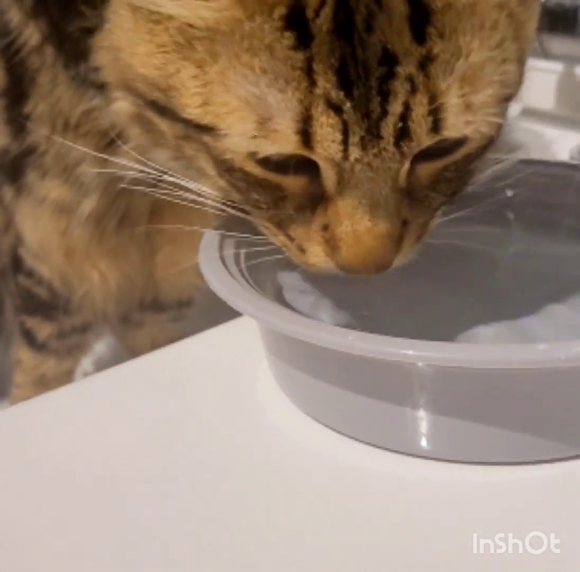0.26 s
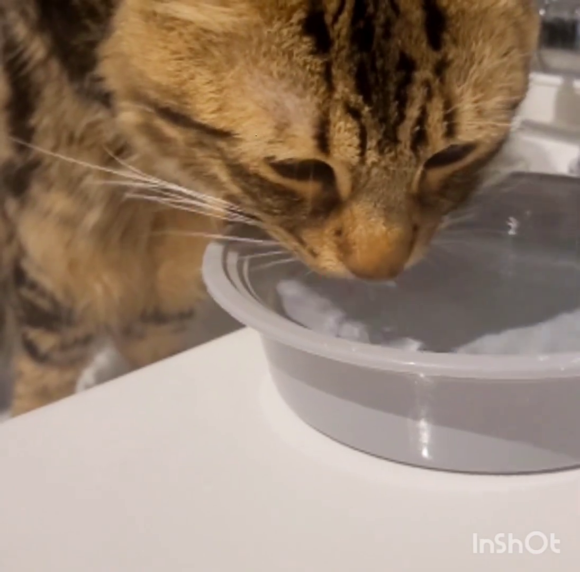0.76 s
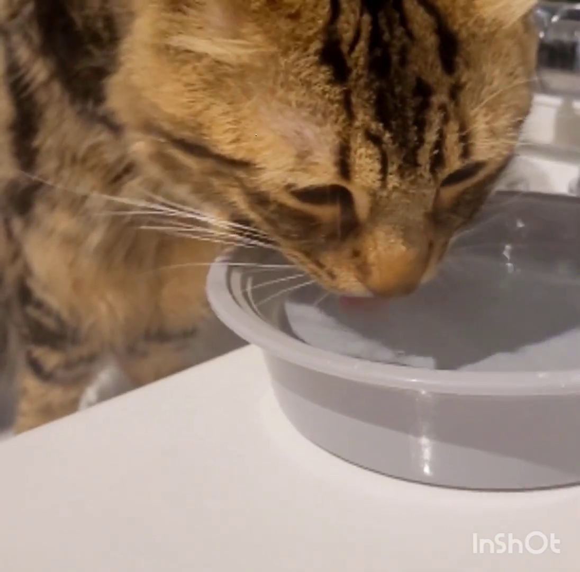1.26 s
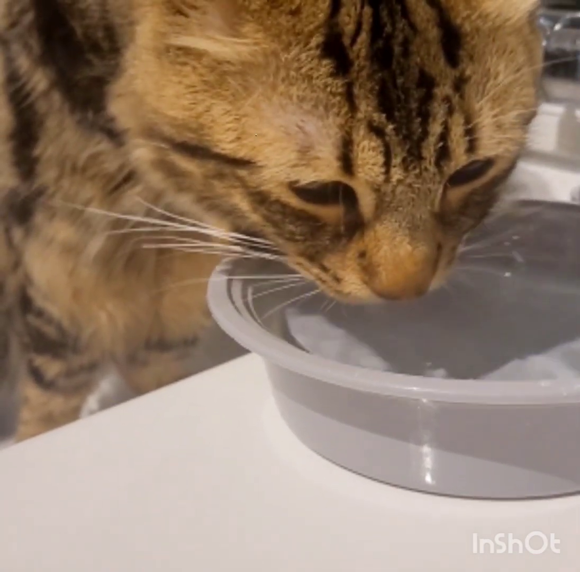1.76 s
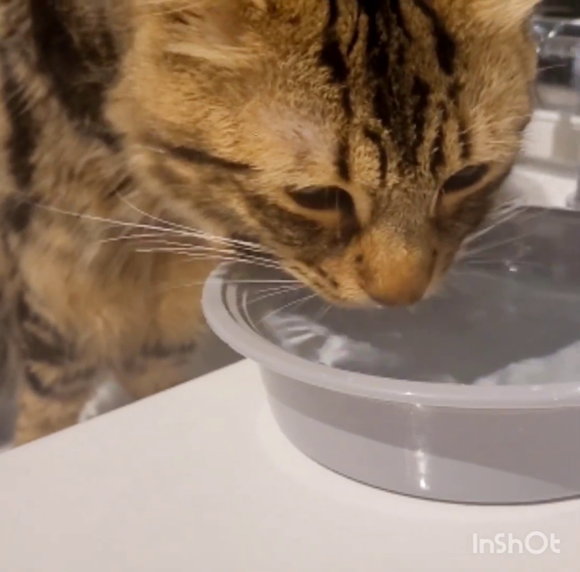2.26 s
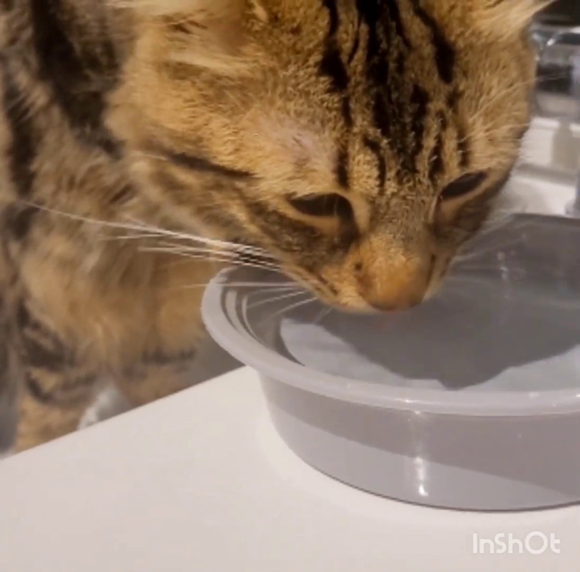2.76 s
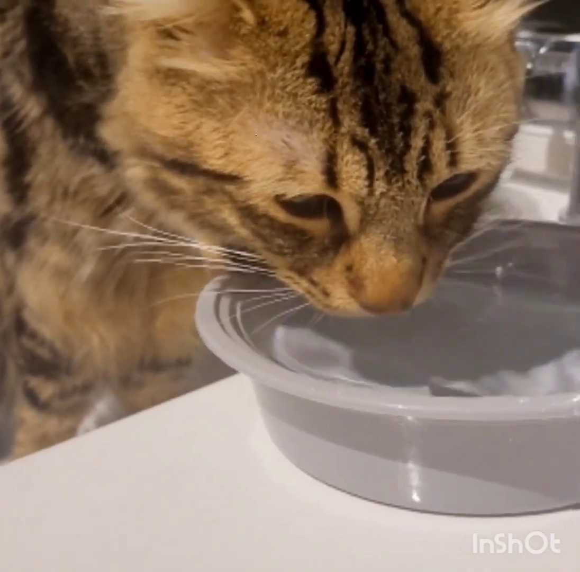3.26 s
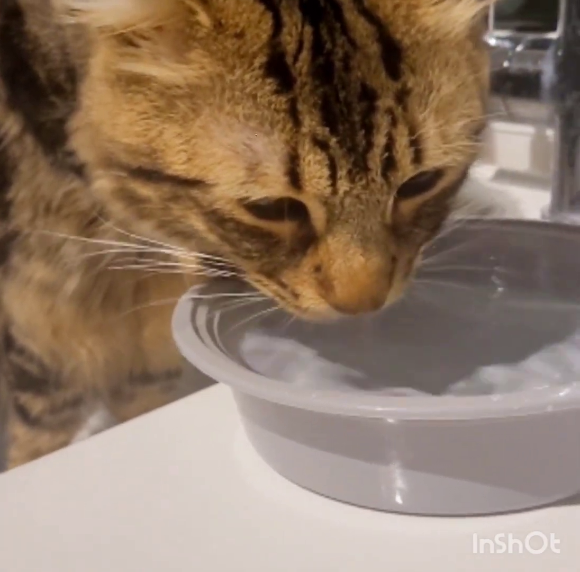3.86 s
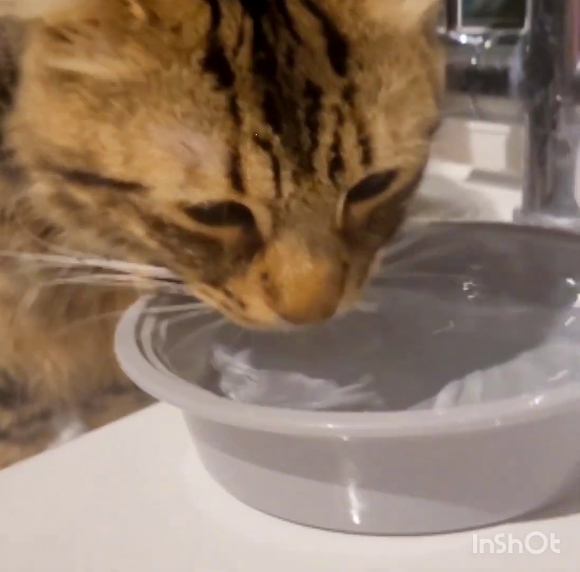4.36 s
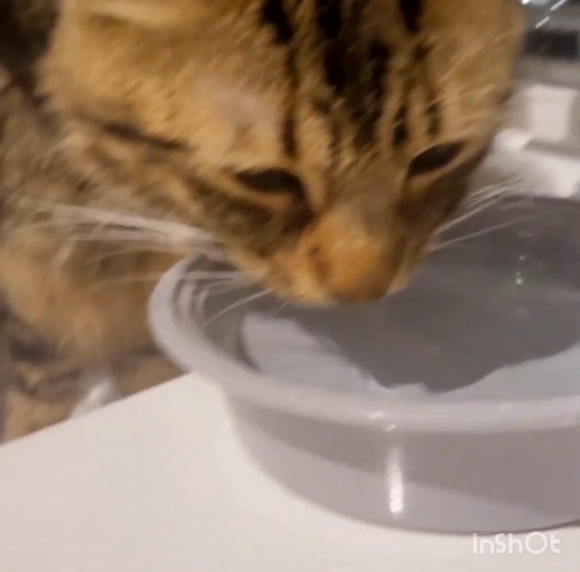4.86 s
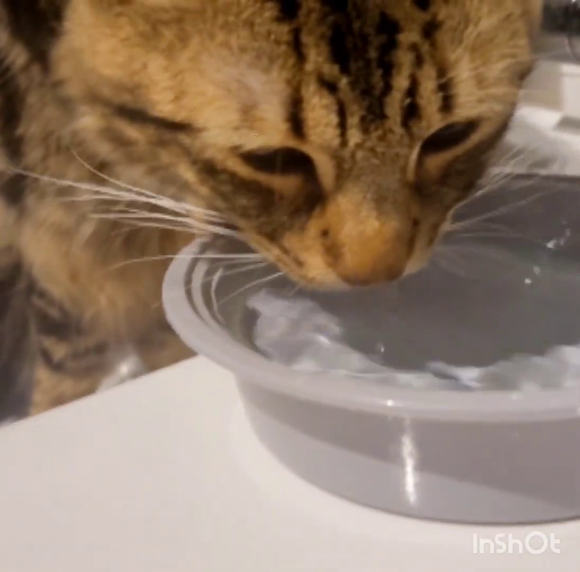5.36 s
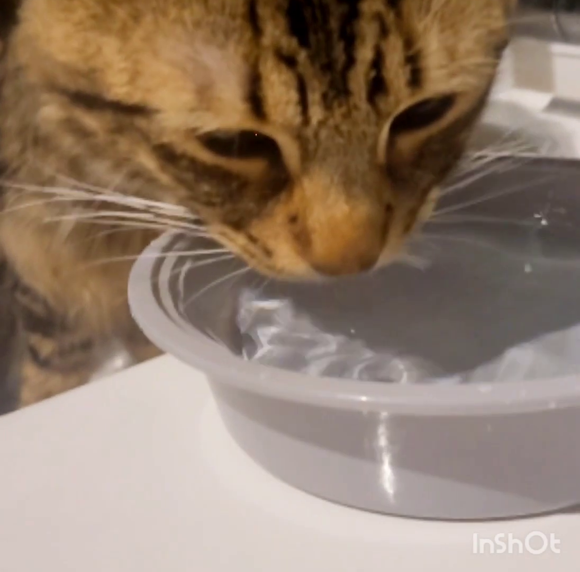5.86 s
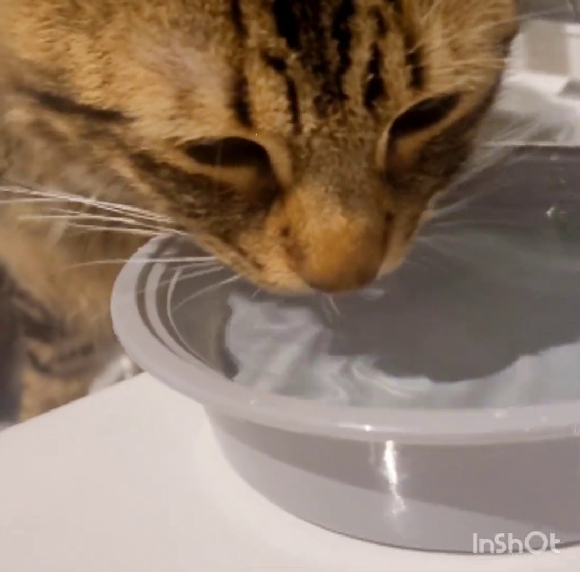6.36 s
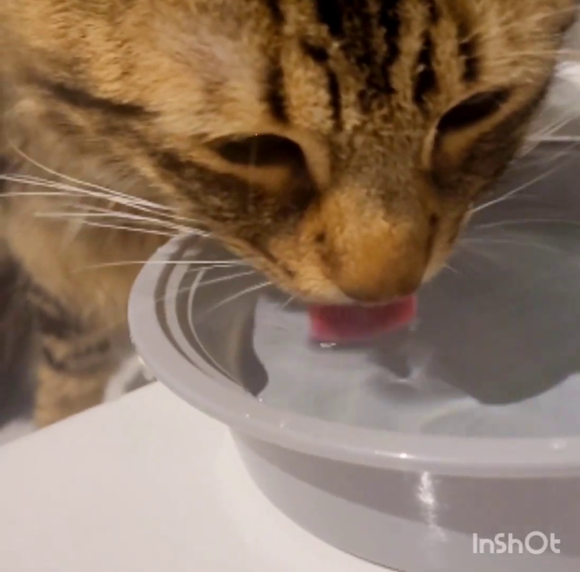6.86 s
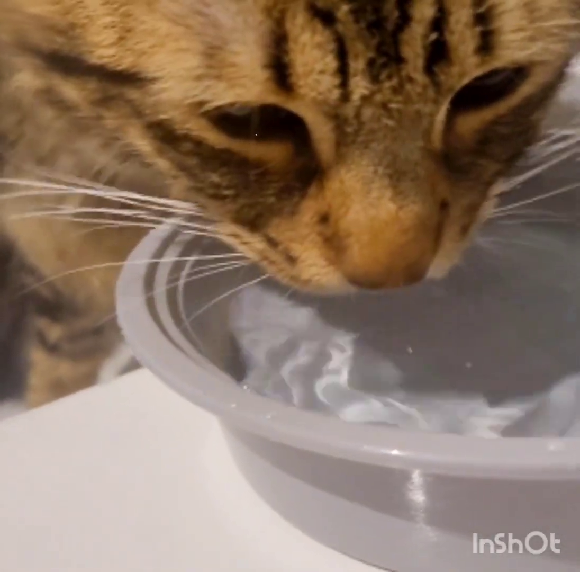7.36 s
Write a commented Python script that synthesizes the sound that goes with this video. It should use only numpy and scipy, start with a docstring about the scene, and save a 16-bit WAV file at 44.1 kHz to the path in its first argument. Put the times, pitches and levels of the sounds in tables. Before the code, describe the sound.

Close, quiet tongue lapping and tiny droplets in a small hard room, later overpowered by dull handling thuds, crackling bumps and grainy skin rubbing.

```python
"""Cat lapping water, hand-held phone

A cat laps from a plastic bowl in a small hard room, close to a phone with two microphones. Tongue pops
and smacks are short ringing blips with noise tails; the nose puffs noise about once a second, with a gap.
Mostly from four seconds on, a finger rubs and slips on the case by the right microphone: hiss from grainy
noise, ticks from blips and low thumps from swings of the case. Knocks, rumble and hum lie behind."""
import sys
import numpy as np
from scipy import signal
from scipy.io import wavfile
from scipy.ndimage import uniform_filter1d

SR = 44100
rng = np.random.default_rng(int(sys.argv[2]) if len(sys.argv) > 2 else 0)


def write(x):
    x = np.atleast_2d(x).T
    wavfile.write(sys.argv[1], SR, np.round(np.clip(x, -1, 1) * 32767).astype(np.int16))


N = 336042
EDGE_HZ = 15900  # upper limit of the recorder's band, and of smack film and droplet pitches

# tongue and water pops at the surface: start_s, level_db, pitch_hz
POPS = [(0.252, -63.5, 1440), (0.572, -60, 1400), (0.736, -65.5, 1100), (0.814, -69, 895),
        (0.843, -60, 1520), (0.858, -64, 2080), (1.074, -69, 1320), (1.1, -60.5, 1510),
        (1.251, -69.5, 1510), (1.376, -56, 1540), (1.472, -58, 745), (1.62, -58.5, 1610),
        (1.685, -65, 1360), (1.857, -62, 780), (1.909, -51.5, 1585), (1.936, -52.5, 1530),
        (2.265, -62.5, 704), (2.495, -61, 1210), (2.567, -62, 1530), (2.831, -57.5, 1470),
        (2.855, -61.5, 2120), (2.948, -62.5, 1520), (3.116, -59.5, 1500), (3.213, -60, 1780),
        (3.241, -52.5, 900), (3.43, -56.5, 1480), (3.578, -61.5, 1400), (3.949, -61.5, 1970),
        (4.571, -51.5, 1040), (4.589, -55.5, 1210), (5.327, -51.5, 850), (5.514, -49, 1640),
        (5.764, -51.5, 990), (6.44, -56.5, 2120), (7.228, -51, 650), (7.313, -59, 1640),
        (7.357, -46.5, 850), (7.401, -56.5, 1960), (7.438, -48.5, 885), (7.608, -46.5, 1450)]
# wet smacks of tongue and lips: start_s, level_db, pitch_hz
SMACKS = [(0.185, -55.5, 7100), (0.608, -63.5, 8400), (1.6337, -58, 12600), (1.8572, -59, 7900),
          (1.8834, -56.5, 11600), (1.918, -53.5, 9700), (1.936, -54.5, 10300), (2.191, -52.5, 11000),
          (2.298, -59.5, 4640), (2.409, -53, 13100), (2.457, -55, 13900), (2.503, -59, 10900),
          (2.6374, -54, 14400), (3.597, -60.5, 8250), (3.999, -50, 4640), (4.1402, -52, 6600),
          (4.299, -60, 7350), (4.3616, -48.5, 4630), (4.715, -49, 11400), (4.8, -53, 12200),
          (4.918, -49, 11100), (4.9346, -51.5, 10200), (5.4293, -48.5, 6800), (5.6486, -50.5, 5470),
          (5.679, -39.5, 15900), (5.9507, -50, 6200), (6.62, -49.5, 4600), (6.806, -51, 6000),
          (6.8263, -51, 13400), (6.858, -51, 5150), (6.982, -45, 5100), (7.228, -51, 13300),
          (7.2437, -47.5, 5500), (7.3122, -55, 11600), (7.3272, -50, 5340), (7.479, -52.5, 6500),
          (7.4957, -59, 11600), (7.515, -53, 3980), (7.55, -57, 7640), (7.593, -48, 8700),
          (7.6112, -36, 5000)]
# room share of water sounds, deep pops stay close under the tongue, high ones spill out: pitch_hz, share_db
POP_ROOM = [(800, -17), (1400, -3.5)]


def amp(db):
    """dB to gain."""
    return 10 ** (np.asarray(db) / 20)


def evened(x):
    """Scales to rms 1."""
    return x / np.sqrt(np.mean(x ** 2) + 1e-20)


def read(points, hz):
    """Reads a table on a log-frequency axis."""
    f, value = np.transpose(points)
    return np.interp(np.log(hz + 1), np.log(f + 1), value)


def add(mix, s, sound):
    """Mixes a sound in at s seconds."""
    part = mix[round(s * SR):][:len(sound)]
    part += sound[:len(part)]


def resonate(x, modes):
    """Sum of two-pole resonances, each given as pitch, width and level."""
    total = 0
    for hz, width_hz, db in modes:
        b, a = signal.iirpeak(hz, hz / width_hz, SR)
        total = total + amp(db) * signal.lfilter(b, a, x)
    return total


def blip(db, hz, cycles, glide=0.75):
    """A brief ring, as of a small air pocket; cycles sets its length, positive glide raises its pitch."""
    turns = np.arange(3000) * hz / SR
    swell = turns ** 2 * np.exp(-turns / (0.13 * cycles))
    shape = swell * np.sin(2 * np.pi * turns * (1 + 0.02 * glide * turns))
    return amp(db) * shape / abs(shape).max()


def mottled(x, patchy_db):
    """Lets the colour of a noise drift in patches of time and frequency."""
    z = signal.stft(x, nperseg=512)[2]
    patches = rng.standard_normal(z.shape[::-1]).T
    patches = uniform_filter1d(uniform_filter1d(patches, 14, 0), 16, 1)
    return signal.istft(z * amp(patchy_db * evened(patches)), nperseg=512)[1][:N]


def tongue_pops(near, far):
    """Air pockets close under the tongue: a ring, a higher snap and an uneven churn of water."""
    # deep pops are blunt, high ones ring: pitch_hz, length_cycles
    pop_cycles = [(900, 1.94), (1450, 3.9)]
    slosh_db, slosh_t60_s = -15, 0.36
    t = np.arange(7000) / SR
    for s, db, hz in POPS:
        noise, wobble = rng.standard_normal((2, len(t)))
        room_db = read(POP_ROOM, hz)
        ragged = amp(4.8 * evened(uniform_filter1d(wobble, 350)) - 60 * t / slosh_t60_s)
        churn = evened(resonate(noise, [(hz, 190, 0)]))
        add(near, s, amp(db + slosh_db + room_db) * ragged * churn)
        ring = blip(db, hz, read(pop_cycles, hz), glide=0.43)
        snap = blip(db - 4.0, 1.6 * hz, 4.2)
        add(near, s, ring + snap)
        add(far, s, blip(db - 4.0 + room_db, hz, 13.0, glide=0.32))


def wet_smacks(near, far):
    """Tongue and lips part with a ring and a crack while a film of water fizzes around the same pitch."""
    ring_db, crack_db, room_db, fizz_db = -2.5, -2.5, -9, -22.5  # relative to each smack's level
    fizz_t60_s, fizz_width = 0.21, 0.34  # width as a share of the pitch
    t = np.arange(7000) / SR
    for s, db, hz in SMACKS:
        film = [(min(hz, EDGE_HZ), fizz_width * hz, 0)]
        fizz = evened(resonate(resonate(rng.standard_normal(len(t)), film), film))
        add(near, s, amp(db + fizz_db - 60 * t / fizz_t60_s) * fizz)
        add(near, s, blip(db + ring_db, hz, 18, glide=0.099) + blip(db + crack_db, hz, 0.67))
        two_pockets = blip(db, hz, 2.5) + 1.3 * blip(db, hz * 0.96, 2.7)
        add(far, s, amp(room_db) * two_pockets)


def droplets(near, far):
    """Each pop and smack sheds five smaller droplets, more fall at random; each is a short ring."""
    drops = []
    for s, db, hz in POPS + SMACKS:
        for when, size, pitch in rng.random((5, 3)):
            drops.append((s + 0.09 * when, db - 27.5 + 12 * size, hz * (0.725 + 0.45 * pitch)))
    for when, size, pitch in rng.random((160, 3)):
        drops.append((when * N / SR, -84 + 12 * size, 600 * 20 ** pitch))
    for s, db, hz in drops:
        drop = blip(db, min(hz, EDGE_HZ), 10.0)
        add(near, s, drop)
        add(far, s, amp(9.0 + read(POP_ROOM, hz)) * drop)


def bowl_knocks(near, far):
    """The bowl knocks dully on the counter: low rings of like duration at any pitch."""
    # knocks: start_s, level_db, pitch_hz
    knocks = [(.008, -57, 296), (.09, -63.5, 333), (1.332, -66.5, 171), (3.079, -60.5, 175)]
    for s, db, hz in knocks:
        add(near, s, blip(db, hz, 0.027 * hz, glide=0.071))
        add(far, s, blip(db + 3.0, hz, 3.2, glide=0.1))


def lapping():
    """Everything at the bowl; returns direct sound and what feeds the room."""
    near, far = np.zeros((2, N))
    tongue_pops(near, far)
    wet_smacks(near, far)
    droplets(near, far)
    bowl_knocks(near, far)
    return near, far


def nose():
    """Turbulent air through the nostrils: coloured noise with a quick start and a fading end."""
    # puffs of air: start_s, level_db
    puffs = [(0.53, -77), (1.53, -80), (3.528, -83), (4.527, -75), (5.517, -74.5), (6.521, -69.5),
             (7.53, -76.5)]
    # nostril resonances: pitch_hz, width_hz, level_db
    nostrils = [(1460, 1000, 9), (3980, 440, 5), (5800, 7100, -4.5)]
    out, t = np.zeros(N), np.arange(8000) / SR
    for s, db in puffs:
        air = evened(resonate(rng.standard_normal(len(t)), nostrils))
        add(out, s, amp(db) * air * np.minimum(t / 0.0018, 1) * np.exp(-(t / 0.045) ** 0.88))
    return out


def slips():
    """Each finger slip jolts the case: a swing that slows towards the rocking pitch, with a shell snap."""
    # slips on the case: start_s, level_db, way (push +1, pull -1), first_hz, rise_ms
    slip_list = [(0.855, -56, 1, 69, 2), (4.0971, -14.5, -1, 423, 5.6), (4.1055, -14, 1, 219, 2.14),
                 (4.7093, -29, -1, 225, 32), (4.8825, -14, 1, 295, 4.9), (4.9008, -10, 1, 283, 4),
                 (4.9191, -7.5, 1, 296, 4.1), (4.9351, -8, 1, 274, 3.8), (5.167, -45.5, 1, 686, 2.4),
                 (5.4294, -42, -1, 365, 8.6), (5.525, -39, -1, 440, 3.5), (5.545, -36, -1, 456, 0.95),
                 (5.8728, -46.5, -1, 251, 15), (5.9213, -34.5, -1, 278, 12), (5.9302, -32.5, -1, 277, 16),
                 (5.9398, -32.5, -1, 332, 3.6), (5.9481, -30.5, -1, 275, 21), (5.9593, -31, -1, 416, 0.9),
                 (5.9701, -26.5, -1, 353, 4), (5.9887, -26.5, -1, 424, 3.54), (6.3281, -36, -1, 440, 0.075),
                 (6.3612, -32, -1, 382, 1.3), (6.3885, -29.5, -1, 390, 0.68), (6.4074, -30, -1, 400, 1.8),
                 (6.4262, -33.5, -1, 450, 0.1), (6.4559, -31.5, -1, 446, 0.091),
                 (6.4934, -34, -1, 410, 0.26), (6.538, -32, -1, 445, 0.071), (6.5539, -32.5, -1, 445, 0.4),
                 (6.6018, -31.5, -1, 600, 0.043), (6.612, -33.5, -1, 400, 0.66),
                 (6.628, -33, -1, 525, 0.57), (6.641, -32.5, -1, 390, 2.2), (6.65, -35, -1, 600, 0.09),
                 (6.6585, -32.5, -1, 640, 0.054), (6.662, -31, -1, 500, 0.59),
                 (6.697, -34.5, -1, 500, 0.26), (6.7135, -32.5, -1, 556, 0.066),
                 (6.73, -35.5, -1, 484, 0.81), (6.748, -47, -1, 600, 0.3), (6.8535, -39.5, -1, 496, 0.08),
                 (6.8979, -37.5, -1, 500, 0.3), (6.9312, -37, -1, 424, 1.1), (6.983, -36, -1, 399.4, 0.8),
                 (6.995, -18, 1, 420, 3.27), (7.2826, -45.5, 1, 670, 3.4)]
    # shell of the case, snapping faster than it rocks: pitch_hz, level_db, t60_s
    shell_modes = [(517, 3.5, 0.0094), (1030, -6, 0.00196)]
    case_hz = 51.7  # the case rocks slowly in the hand
    quick_turns, turns_per_rise_ms = 0.65, 0.12  # fast swings before the rocking pitch is reached
    # a soft touch or a quick regrip damps the swing
    free_t60_ms, gaps_to_die, damping_per_rise_ms = 870, 5.8, 0.0024
    # soft flesh lets the first swings through, then holds the case
    grip_from_ms, grip_per_rise_ms, grip_most = 3.2, 2.3, 0.96
    push_turns, pull_turns = 1.1, 1.45  # swings let through
    settle_ms = 44  # the hand steadies the case again
    shiver_hz, shiver_db, shiver_cycles = 165, -18, 6  # a gripped case still shivers
    crack_hz, crack_db, crack_db_per_rise_ms = 2430, -23.5, -8  # abrupt slips also crack

    out, shell, crack = np.zeros((3, N))
    t = np.arange(14000) / SR
    ms = 1000 * t
    snap = sum(amp(db - 60 * t / t60_s) * np.sin(2 * np.pi * hz * t) for hz, db, t60_s in shell_modes)
    gaps_ms = 1000 * np.diff([row[0] for row in slip_list] + [N / SR])
    for (s, db, way, hz, rise_ms), gap_ms in zip(slip_list, gaps_ms):
        quick = quick_turns + turns_per_rise_ms * rise_ms
        turns = case_hz * t + quick * (1 - np.exp(-(hz - case_hz) * t / quick))
        t60_ms = 1 / (1 / free_t60_ms + 1 / (gaps_to_die * gap_ms) + damping_per_rise_ms * rise_ms)
        grip = np.clip(grip_per_rise_ms * (rise_ms - grip_from_ms), 0, grip_most)
        free_turns = push_turns if way > 0 else pull_turns
        held = 1 - grip + grip * np.exp(-(turns / free_turns) ** 6)
        held = held * np.exp(-(ms / settle_ms) ** 4)
        swing = (1 - np.exp(-ms / rise_ms)) * amp(-60 * ms / t60_ms) * held * np.sin(2 * np.pi * turns)
        swing = swing / abs(swing).max()
        # abrupt slips snap most
        add(out, s, np.sign(way) * amp(db) * (swing + amp(-2.4 * rise_ms) * snap))
        add(shell, s, -amp(db) * (amp(4 - 0.79 * rise_ms) * snap + 0.64 * swing))
        add(out, s, grip * blip(db + shiver_db, shiver_hz, shiver_cycles, glide=0))
        add(crack, s, blip(db + crack_db + crack_db_per_rise_ms * rise_ms, crack_hz, 5.4, glide=0.2))
    return out, shell, crack


def rocking():
    """The whole phone rocks in the hand, heard at the left port: low rings falling in pitch."""
    # rocks: start_s, level_db, pitch_hz, length_cycles
    rocks = [(4.104, -30, 150, 3.6), (6.9946, -22.5, 177, 2.7)]
    out = np.zeros(N)
    for s, db, hz, cycles in rocks:
        add(out, s, blip(db, hz, cycles, glide=-14.5))
    return out


def rattle(jolt):
    """The shaken shell creaks: noise in its low resonances, which stops growing under hard shaking."""
    shaking = np.tanh(np.sqrt(abs(uniform_filter1d(jolt ** 2, 300))) / amp(-38.0))
    modes = [(171, 160, 0.5), (456, 165, -8.5), (900, 100, -23), (1910, 450, -24.0)]
    return amp(-51) * shaking * evened(resonate(rng.standard_normal(N), modes))


def skin():
    """Skin rubs and ticks at the right port: grainy friction noise in resonances, and single blips."""
    # rubbing, finest hiss relative to the main band: time_s, level_db, hiss_db
    rub = [(2.45, -102, 9), (2.75, -65, -2), (3.7, -77, 0), (4.05, -66, 1), (4.25, -73, -3.5),
           (4.4, -61.5, -1), (4.7, -67, -4.5), (4.9, -59.5, 1.5), (5.122, -55, -3), (5.25, -68, -8),
           (5.55, -58, -5), (5.63, -76, -6), (5.86, -69.5, -8), (5.94, -52.5, 8), (6.06, -57, -2.5),
           (6.28, -68.5, 1), (6.42, -57.5, -5.5), (6.56, -66, -9), (6.7, -55, -18), (6.78, -68, -8.5),
           (7.15, -91, 3.5), (7.3, -80, 5)]
    # main band of the rubbing: pitch_hz, width_hz, level_db
    skin_mid = [(1770, 390, 0), (6420, 980, 4.5)]
    # finest hiss: pitch_hz, width_hz, level_db
    skin_top = [(10700, 2400, 7), (14650, 4100, 2.1)]
    # a barely touching finger whistles higher: pitch_hz, width_hz, level_db
    light_touch = [(7450, 580, 9)]
    # ticks of skin: start_s, level_db
    ticks = [(4.103, -44), (4.1086, -33), (4.482, -51.5), (4.758, -40), (6.997, -39.5)]
    light_db, firm_db = -80.5, -53.5  # rubbing levels between which the light whistle gives way
    tick_hz = 6880

    s, db, top_db = np.transpose(rub)
    t = np.arange(N) / SR
    level_db = np.interp(t, s, db)
    bumps = evened(uniform_filter1d(rng.standard_normal(N), 150))
    grain = rng.standard_normal(N) * amp(2.0 * bumps)
    firm = np.clip((level_db - light_db) / (firm_db - light_db), 0, 1)
    firm_rub = evened(resonate(grain, skin_mid))
    light_rub = evened(resonate(grain, skin_mid[:1] + light_touch))
    hiss = evened(resonate(grain, skin_top[1:]) + (1.2 - firm) * resonate(grain, skin_top[:1]))
    out = firm * firm_rub + (1 - firm) * light_rub + amp(np.interp(t, s, top_db)) * hiss
    out = mottled(out, patchy_db=1.6) * amp(level_db) * (t > s[0])
    for when, tick_db in ticks:
        add(out, when, blip(tick_db, tick_hz, 16.0, glide=0.24))
        add(out, when, blip(tick_db + 17.0 + np.interp(when, s, top_db), 11700, 1.76, glide=0.1))
    return out


def walls(x):
    """Reflections of the small hard room: sparse taps of random sign, each band dying at its own speed."""
    # decay of the room: pitch_hz, t60_s
    decay = [(500, 0.48), (1600, 0.15), (5000, 0.16), (12000, 0.089)]
    taps = np.zeros((2, SR // 2))
    at = np.arange(200, SR // 2 - 20, 20)
    at = at + rng.integers(0, 20, (2, len(at)))
    np.put_along_axis(taps, at, rng.choice([-1., 1.], at.shape), 1)
    hz, t, z = signal.stft(taps, SR, nperseg=256)
    tail = signal.istft(z * amp(-60 * t / read(decay, hz)[:, None]), SR, nperseg=256)[1]
    return signal.fftconvolve(x[None], tail / np.linalg.norm(tail[0]), axes=1)[:, :N]


def room_tone():
    """Low rumble and faint air: shaped noise, partly alike at both ports, drifting in patches."""
    # colour of the room tone: pitch_hz, density_db (per Hz)
    colour = [(60, -7.5), (110, -8), (195, -15.5), (355, -10.5), (554, -18), (1160, -24), (2980, -35),
              (5900, -39), (14800, -31.5)]
    # left-right likeness: pitch_hz, likeness (0 to 1)
    likeness = [(60, 0.46), (400, 0.64), (800, 0.66), (2000, 0.023)]
    frames, hz = N // 256 + 5, np.fft.rfftfreq(1024, 1 / SR)
    a, b, c, d, patches = rng.standard_normal((frames, 513, 5)).T
    patches = evened(uniform_filter1d(uniform_filter1d(patches, 12, 0), 14, 1))
    same = np.clip(read(likeness, hz), -1, 1)[:, None]
    left, other = a + 1j * b, c + 1j * d
    z = np.array([left, same * left + np.sqrt(1 - same ** 2) * other])
    drift_db = np.clip(900 / (hz[:, None] + 400), 0.7, 2) * patches
    z *= amp(read(colour, hz)[:, None] + drift_db)
    return amp(-73.5) * evened(signal.istft(z, nperseg=1024, noverlap=768)[1][:, :N])


def building_hum():
    """A building rumble and a faint wavering hum: noise passed twice through a narrow resonance."""
    out = np.zeros(N)
    for db, hz, width_hz in [(-73.0, 51.2, 20), (-86, 354.3, 14)]:
        mode = [(hz, width_hz, 0)]
        out += amp(db) * evened(resonate(resonate(rng.standard_normal(N), mode), mode))
    return out


def scene():
    """Each port colours airborne sound; touch reaches the right capsule first, the left faintly."""
    # phone moves nearer the bowl, tipping its left port away: time_s, left_direct_db, room_share_db
    approach = [(3.9, -1, -3.5), (4.099, -5, -5)]
    # left port resonances added to a flat response: pitch_hz, width_hz, level_db
    left_port = [(2470, 270, 0.3), (4800, 1900, 9.7)]
    # right port resonances added to a flat response: pitch_hz, width_hz, level_db
    right_port = [(1693, 530, 1.7), (7180, 1220, 8.4)]

    near, far = lapping()
    puffs = nose()
    t = np.arange(N) / SR
    s, shade_db, room_db = np.transpose(approach)
    shade, wet = amp(np.interp(t, s, shade_db)), amp(np.interp(t, s, room_db))
    direct = near * [shade, np.ones(N)] + 0.24 * puffs
    air = direct + walls(wet * far + 2.8 * puffs) + room_tone() + building_hum()
    left = air[0] + resonate(air[0], left_port)
    late = np.roll(air[1], 4)  # 3 cm further from the bowl
    right = amp(4.0) * (late + resonate(late, right_port))

    jolt, shell, crack = slips()
    rub = skin()
    soft_skin = signal.butter(8, 1950, fs=SR, output="sos")  # blunts the edges
    jolt = signal.sosfilt(soft_skin, jolt + rattle(jolt))
    shell = np.roll(shell, 12)  # the far end bends a little later, always in one sense whichever way the slip goes
    shell = shell + resonate(shell, [(67.5, 39, 14)]) + 10.8 * rattle(jolt)
    through_case = amp(-25.0) * signal.sosfilt(signal.butter(4, 850, fs=SR, output="sos"), shell)
    left = left + through_case + rocking() + amp(-20) * np.roll(rub, 40)
    return np.array([left, right + jolt + crack + rub])


def record(dry):
    """Bass roll-off of the capsules, then the band limit of the recorder."""
    dry = signal.sosfilt(signal.butter(3, 38, "high", fs=SR, output="sos"), dry)
    band = signal.firwin(511, EDGE_HZ, window=("kaiser", 9), fs=SR)
    return signal.oaconvolve(dry, band[None], "same")


dry = scene()
out = record(dry)
write(out)
```